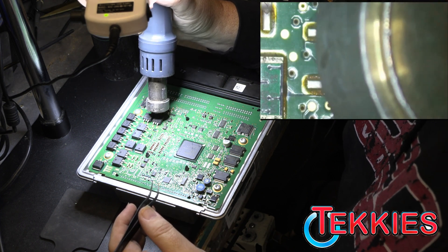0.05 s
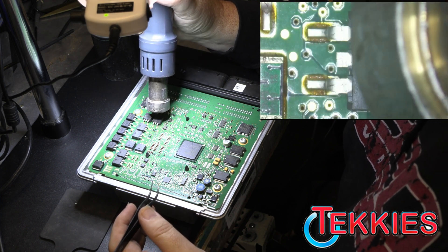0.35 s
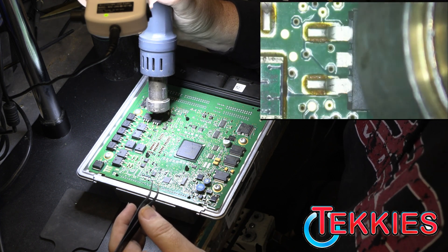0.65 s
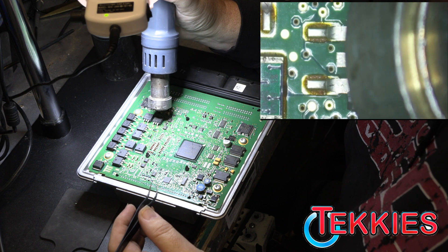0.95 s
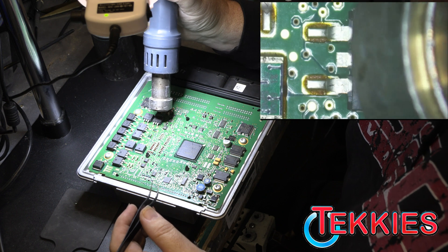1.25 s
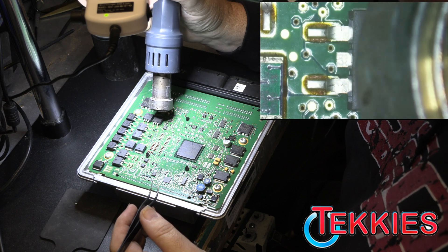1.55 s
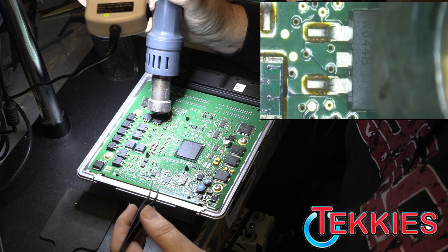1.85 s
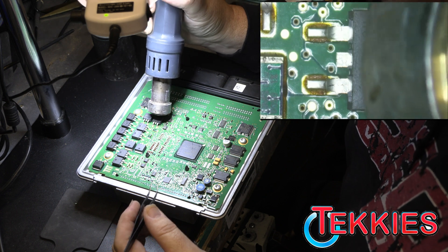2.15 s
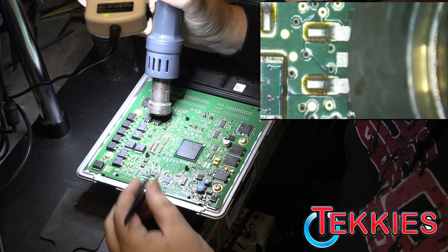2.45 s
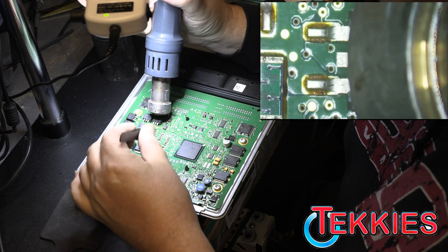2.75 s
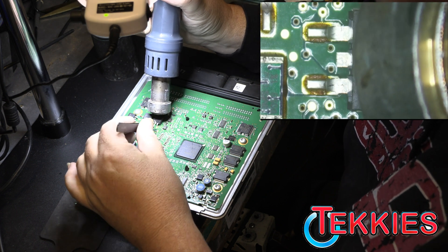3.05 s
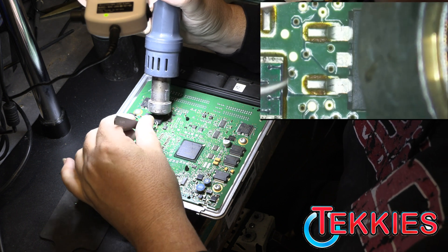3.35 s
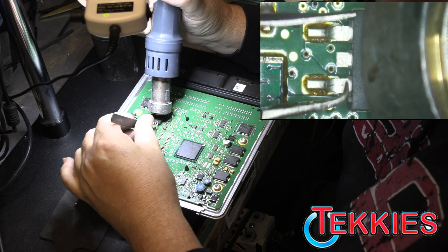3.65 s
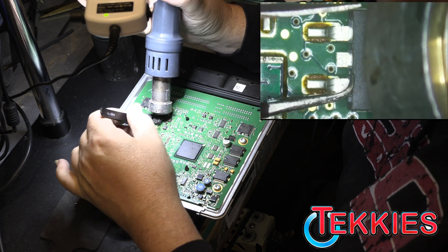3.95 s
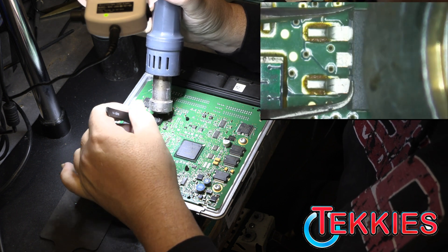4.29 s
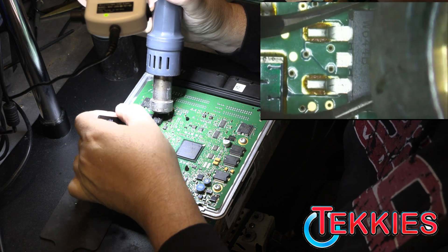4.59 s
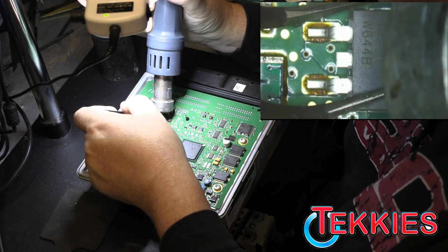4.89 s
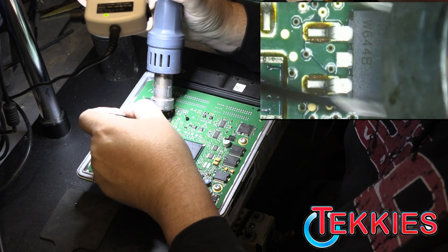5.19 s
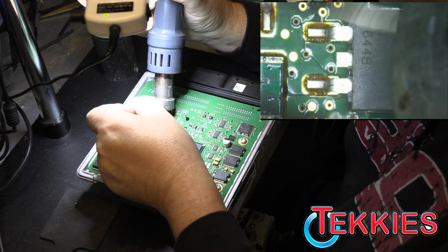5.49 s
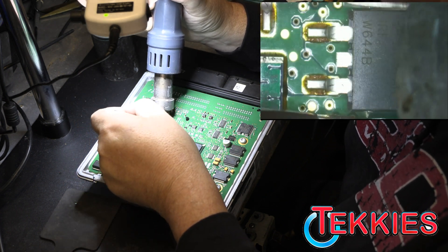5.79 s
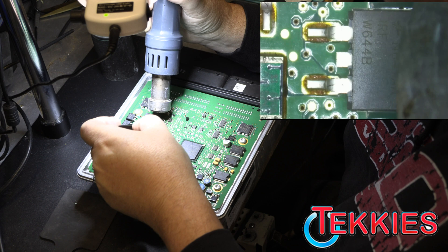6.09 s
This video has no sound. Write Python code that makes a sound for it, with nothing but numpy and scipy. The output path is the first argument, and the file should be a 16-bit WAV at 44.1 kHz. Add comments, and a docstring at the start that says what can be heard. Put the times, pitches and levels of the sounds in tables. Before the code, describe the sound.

A hot air tool blows continuously for about six seconds, heard close up at a workbench. The blower holds a steady low hum with a few thin overtones, beneath a hollow rush of air and a bright hiss from the nozzle. The hiss changes colour gently as the nozzle wanders, swelling a little around 2.5 and 3.8 seconds. Faint, high, airy whistles fade in and out through the first four and a half seconds and return near the end. A very faint electrical hum and bench rumble lie underneath. From about 3.8 to 4 seconds, a hand with tweezers knocks lightly on the circuit board a few times, with another soft tap at 4.5. More small taps with a slight scuff and rattle follow between 5.2 and 5.9 seconds, the clearest at 5.7. The air is still blowing at the end.

```python
"""At a workbench, a hot air rework station blows steadily on a chip of a circuit board.
Blower and transformer hum over a faint bench rumble. Air rushes through the resonant handpiece and
hisses out of the nozzle, changing colour as it wanders and whistling airily where it catches an edge.
In the second half a hand with tweezers knocks lightly on the board."""
import sys
import numpy as np
from scipy import signal
from scipy.fft import rfft, irfft
from scipy.io import wavfile
from scipy.ndimage import map_coordinates

SR = 44100
rng = np.random.default_rng(int(sys.argv[2]) if len(sys.argv) > 2 else 0)


def generate_wav(signal):
    """Clip the signal to [-1, 1] and save it as 16-bit WAV at the path in sys.argv[1]."""
    frames = np.transpose(np.atleast_2d(signal))
    scaled = np.clip(frames, -1, 1) * 32767
    pcm = np.round(scaled).astype(np.int16)
    wavfile.write(sys.argv[1], SR, pcm)


N = 274743
TIME_S = np.arange(N) / SR
BINS_HZ = np.arange(N // 2 + 1) * SR / N


def from_db(db):
    """Decibels to gain."""
    return 10 ** (np.asarray(db) / 20)


def rms(x):
    """Root mean square."""
    return np.sqrt(np.mean(x ** 2) + 1e-20)


def filtered(x, order, hz, kind="low"):
    """Butterworth filter."""
    return signal.sosfilt(signal.butter(order, hz, kind, fs=SR, output="sos"), x)


def automation(points):
    """A (time_s, value) curve, sample by sample."""
    return np.interp(TIME_S, *np.transpose(points))


def eq_curve_db(points):
    """A (freq_hz, gain_db) curve, joined on a log-frequency axis."""
    hz, db = np.transpose(points)
    return np.interp(np.log(BINS_HZ + 1e-9), np.log(hz), db)


def bells_db(bells):
    """Bell-shaped boosts and cuts, widths taken at half height."""
    return sum(db * .5 ** ((2 * (BINS_HZ - centre) / width) ** 2) for centre, width, db in bells)


def drift(rate_hz):
    """Slow random modulation with an rms of 1."""
    size = N // 100 + 2
    rolloff = 1 + (BINS_HZ[:size // 2 + 1] / rate_hz) ** 2
    slow = irfft(rfft(rng.standard_normal(size)) / rolloff, size)
    return np.interp(np.linspace(0, size - 1, N), np.arange(size), slow / rms(slow))


def gate(start_s, length_s, fade_s):
    """Fade in, hold, fade out."""
    return np.clip(np.minimum(TIME_S - start_s, start_s + length_s - TIME_S) / fade_s, 0, 1)


def ring(force, hz, t60_s):
    """One mode: a click sets a decaying sine ringing."""
    decay, angle = from_db(-60 / (t60_s * SR)), 2 * np.pi * hz / SR
    return signal.lfilter([0, np.sin(angle)], [1, -2 * decay * np.cos(angle), decay ** 2], force + 1e-18)


def bench_rumble(level_db=-72, swell_db=7.5, peak_s=4.4, swell_s=.9):
    """A faint, dull rumble that swells while the hand settles on the bench."""
    rumble = filtered(rng.standard_normal(N), 3, [58, 125], "band")
    settling = np.exp(-((TIME_S - peak_s) / swell_s) ** 2)
    return from_db(level_db + swell_db * settling) * rumble / rms(rumble)


def transformer_hum(pitch_hz=120, start_db=-69.5, rise_db_per_s=1.47):
    """The transformer hums on one low tone, creeping up in level."""
    peak = np.sqrt(2) * from_db(start_db + rise_db_per_s * TIME_S)
    return peak * np.sin(2 * np.pi * pitch_hz * TIME_S)


# Blower tones, as multiples of the shaft rate: harmonic, level_db
BLOWER_TONES = [(1, -44), (3, -63.5), (6, -60.5), (12, -56.5)]
def blower_hum(shaft_hz=253.0, wobble_hz=0.173):
    """The blower turns at a nearly fixed speed; turbulence shakes its overtones most."""
    turns = np.cumsum(shaft_hz + wobble_hz * drift(3.33)) / SR
    out = 0
    for harmonic, level_db in BLOWER_TONES:
        flutter = 1 + (0.076 if harmonic == 1 else 0.2) * drift(23.0)
        tone = np.sin(2 * np.pi * (round(harmonic) * turns + rng.random()))
        out += np.sqrt(2) * from_db(level_db) * flutter * tone
    return out


# Ring of the board in its tray: pitch_hz, gain_db, t60_s
BOARD_MODES = [(299, -7, 0.099), (486, -9, 0.058), (615, -3.5, 0.063), (722, -5, 0.075), (925, -4, 0.045),
               (1115, -10, 0.032), (1403, -5, 0.044), (1467, 2.5, 0.056), (1770, 0, 0.038),
               (1870, 2, 0.051), (2140, 6, 0.03), (2290, -1, 0.036)]
def board_ring(force, brightness_hz):
    """Softer contacts ring duller, and the small board radiates little bass."""
    force = filtered(force, 2, brightness_hz)
    force = filtered(force, 2, 220, "high")
    return sum((-1) ** k * from_db(gain_db) * ring(force, pitch_hz, t60_s)
               for k, (pitch_hz, gain_db, t60_s) in enumerate(BOARD_MODES))


# Knock cues: start_s, board_db, contact_s, brightness_hz, rub_db, rattle_db
KNOCK_CUES = [(3.791, -43, 0.028, 2400, -42.5, -54), (3.816, -39, 0.012, 260, -47, -54),
              (3.869, -45, 0.014, 900, -50, -56), (4.02, -40.5, 0.018, 700, -48, -56),
              (4.482, -46, 0.015, 900, -54, -58), (5.251, -43, 0.018, 2000, -44, -53),
              (5.562, -46, 0.01, 1800, -47, -47), (5.702, -33.5, 0.016, 2500, -43, -39),
              (5.882, -38.5, 0.02, 740, -53, -42)]
def tweezer_knocks(scuff=0.69, chatter=0.55, clicks=4):
    """Tap, chatter and scuff ring the board and rattle the tweezers; the rubbing is heard too."""
    out, size = np.zeros(N), SR // 5
    t = np.arange(size) / SR
    for start_s, board_db, contact_s, brightness_hz, rub_db, rattle_db in KNOCK_CUES:
        friction = rng.standard_normal(size) * np.sin(np.pi * np.minimum(t / contact_s, 1) ** .5)
        force = scuff * friction / np.linalg.norm(friction)
        force[0] += 1  # the tap
        chatter_at = (contact_s * SR * rng.random(clicks)).astype(int)
        force[chatter_at] += chatter * rng.choice([-1, 1], clicks)
        body = board_ring(force, brightness_hz)
        rub = filtered(friction, 3, [600, 2200], "band")
        rattle = ring(force, hz=1436, t60_s=.035)  # tweezers, damped by the fingers
        layers = [(board_db, body), (rub_db, rub), (rattle_db, rattle)]
        knock = sum(from_db(db) * layer / rms(layer[t < contact_s]) for db, layer in layers)
        start = round(start_s * SR)
        out[start:start + size] += knock[:N - start]
    return out


# Airy whistle cues: start_s, length_s, pitch_hz, glide_hz_per_s, width_hz, level_db
WHISTLE_CUES = [(-.2, 1.15, 5380, 1, 220, -47.5), (-.2, 1.45, 2838, 0, 950, -47),
                (-.2, 1.1, 7660, 2, 450, -49), (.82, 0.58, 6100, 2, 140, -51),
                (.8, 1.5, 7200, 70.5, 120, -54.5), (1.506, 0.45, 9200, -2, 400, -58),
                (1.901, 1.1, 6270, 201, 450, -53), (2.798, .9, 8100, 99, 200, -52),
                (1.602, 1.34, 1938, 0, 423, -46.5), (2.047, 0.75, 5820, 80, 160, -53),
                (3.706, 0.52, 5900, 0, 160, -50.5), (3.95, .5, 8370, 0, 180, -60),
                (5.8, .7, 7320, 0, 139, -49)]
def edge_whistles(fade_s=0.21):
    """Turbulence in one resonance fades in as the jet meets an edge and glides as it moves along it."""
    out = 0
    for start_s, length_s, pitch_hz, glide_hz_per_s, width_hz, level_db in WHISTLE_CUES:
        turbulence = filtered(rng.standard_normal((2, N)), 2, width_hz / 2)
        glide_hz = glide_hz_per_s * np.clip(TIME_S - start_s, 0, length_s)
        phase = 2 * np.pi * np.cumsum(pitch_hz + glide_hz) / SR
        note = turbulence[0] * np.cos(phase) + turbulence[1] * np.sin(phase)
        out += from_db(level_db) * note / rms(note) * gate(start_s, length_s, fade_s)
    return out


def early_reflections(x, share=0.33, sway_s=.00002, paths=8):
    """Bench, lamp and hands throw the treble back; the paths sway as the nozzle wavers."""
    treble = filtered(x, 2, 3300, "high")
    out = x.copy()
    for delay_s in rng.uniform(.003, .014, paths):
        read_at = (TIME_S - delay_s - sway_s * drift(0.42)) * SR
        for channel in range(2):
            echo = map_coordinates(treble[channel], [read_at], order=2, mode="wrap")
            out[channel] += share / np.sqrt(paths) * echo
    return out


# Detour by way of the board, set by how the nozzle is held: time_s, extra_path_cm
BOUNCE_PATH = [(0, 13.4), (.7, 13.3), (1.1, 16.5), (1.8, 15.2), (2.5, 15.3), (3.3, 14.2), (3.9, 13.5),
               (4.3, 12.4), (5.1, 12.5), (6.23, 14.6)]
def board_bounce(x, share=0.097, sound_cm_per_s=34300):
    """Treble bounces off the board: a light comb filter that slides as the nozzle moves."""
    read_at = np.arange(N) - automation(BOUNCE_PATH) / sound_cm_per_s * SR
    treble = signal.sosfiltfilt(signal.butter(2, 2800, "high", fs=SR, output="sos"), x)
    echo = np.array([map_coordinates(channel, [read_at], order=2, mode="wrap") for channel in treble])
    return x + share * echo


# Dips in the hiss while a position is held: start_s, length_s, centre_hz, width_hz, gain_db
HOLLOW_CUES = [(0.3, 1.3, 6590, 200, -5), (1.2, .55, 6570, 220, -1), (-0.2, 1.1, 5850, 300, -2),
               (1.0, .85, 5620, 330, -4), (-1.5, 1.6, 7600, 200, -2), (-1.5, 1.2, 7500, 200, -2.5),
               (5, 1.35, 4820, 250, -3.5), (4.5, 1.6, 5200, 600, -1.5), (5, .9, 7220, 200, -8),
               (4.5, 0.96, 10400, 2300, -1.8), (3.5, 2.1, 3330, 150, -4), (5.5, 2.2, 6600, 510, -3),
               (4.6, 1.5, 6500, 370, -0.5), (-1.5, 2.25, 13000, 2700, -1)]
def hiss_hollows(x, fade_s=0.082):
    """Bands of the hiss hollow out and fill again as nozzle and hand shift."""
    spectrum, out = rfft(x), x.copy()
    for start_s, length_s, *bell in HOLLOW_CUES:
        cut = irfft(spectrum * (from_db(bells_db([bell])) - 1), N)
        out += gate(start_s, length_s, fade_s) * cut
    return out


# Broad tone of the air stream: freq_hz, gain_db
AIR_EQ = [(30, -23), (80, -9), (140, 3), (400, 5), (900, -7), (1100, -7), (1500, -10), (3000, 0),
          (3550, -4.5), (4200, -3.5), (7800, -4.5), (10500, -20), (13000, -26), (14500, -39.5)]
# Air column of hose and heater barrel: centre_hz, width_hz, gain_db
BARREL_RESONANCES = [(150, 17, 4.5), (208.2, 4, 5.5), (232, 5.5, 5.5), (288.6, 50, 11.5), (340, 36, 2),
                     (378, 45, 3), (619, 35, 7), (703, 17, 4.5), (771, 117, 6.5), (927, 140, 8),
                     (1007, 26, 5.5), (1205, 88, 5.5), (1278, 68, 7), (1365.5, 62, 13.5),
                     (1486.4, 50, 14.5), (1520, 13, 10.5), (1592, 81, 8.5), (1714, 156, 7),
                     (1815.6, 58, 12.5), (1952, 113, 11.5), (2066, 78, 9.5), (2170, 98, 5.5), (2279, 30, 9),
                     (2410, 17, 3.5), (2576, 23, 6), (2607, 43, 5), (2827, 70, 6), (2936, 91, 5),
                     (3047, 46, -0.5), (3170, 210, 3)]
# Nozzle and its gap to the board: centre_hz, width_hz, gain_db
NOZZLE_RESONANCES = [(3570, 200, -1.3), (3893, 123, 6), (4110, 175, 5), (4294, 127, 5), (4980, 440, 7),
                     (5364, 270, 7), (5700, 200, -2.5), (6560, 200, 1), (5850, 150, 2.5), (7240, 130, 3),
                     (7510, 130, 6), (7910, 240, 3), (8450, 590, -5), (9880, 830, 4.5), (12650, 400, 2.5)]
# Stereo width of the air: freq_hz, side_minus_mid_db
AIR_WIDTH = [(30, -26), (60, -13), (230, -20), (650, -14.5), (1100, -12), (1350, -14), (2800, -15),
             (3600, -7.5), (4000, -8.5), (4600, -12), (5200, -13), (6300, -8), (7600, -16.5), (8400, -3.5),
             (10000, -11), (12000, -17), (13000, -32)]
# Pan of the air: freq_hz, left_minus_right_db
AIR_PAN = [(300, 0.5), (1100, 0), (1700, 2), (3000, -0.8), (4400, 2.0), (7000, 1.5), (8000, 3), (9800, 0)]
def handpiece_turbulence():
    """Turbulence coloured by barrel and nozzle; its scattered part differs between left and right."""
    colour_db = eq_curve_db(AIR_EQ) + bells_db(BARREL_RESONANCES) + bells_db(NOZZLE_RESONANCES)
    direct, scattered = rfft(rng.standard_normal((2, N))) * from_db(colour_db)
    left_right = np.array([[1], [-1]])
    side = left_right * scattered * from_db(eq_curve_db(AIR_WIDTH))
    pan = from_db(left_right * eq_curve_db(AIR_PAN) / 2)
    return irfft((direct + side) * pan, N)


# Fader ride as the nozzle wanders, played as a swing about its mean: time_s, fader_db
HISS_RIDE = [(0.0, -40), (0.21, -38), (0.78, -39), (0.9, -40), (1.41, -40.5), (2.51, -36.5), (2.81, -38),
             (3.8, -36.5), (4.5, -38), (5.05, -38.5), (5.62, -40), (6.23, -38)]
# Splits between the air's bands: crossover_hz
CROSSOVERS_HZ = [450, 1100, 2400, 4400, 5700, 8300]
# Hose drone, rush, low barrel, high barrel, nozzle, gap hiss, sizzle: level_db, ride_share, fade_db_per_s
AIR_BANDS = [(-46.5, 0.11, 0), (-48.5, 0.071, 0), (-43, 0.00058, 0.04), (-42, 0.16, 0.26), (-42, 0.62, 0),
             (-42.0, 0.79, 0.31), (-52, 0.48, 0)]
def air_jet(flicker_db=0.27):
    """Air rushes out of the nozzle: the low bands stay nearly steady, the high ones swell as it wanders."""
    spectrum = rfft(board_bounce(early_reflections(handpiece_turbulence())))
    ride_db = automation(HISS_RIDE)
    swing_db = ride_db - ride_db.mean()
    band_of_bin = np.searchsorted(CROSSOVERS_HZ, BINS_HZ)
    out = 0
    for k, (level_db, ride_share, fade_db_per_s) in enumerate(AIR_BANDS):
        band = irfft(spectrum * (band_of_bin == k), N)
        fade_db = fade_db_per_s * (TIME_S - TIME_S.mean())
        band_db = level_db + ride_share * swing_db - fade_db + flicker_db * drift(20)
        out += band / rms(band.mean(axis=0)) * from_db(band_db)
    return out


def scene():
    """Air, hums, rumble and knocks, all close up."""
    air = hiss_hollows(air_jet()) + edge_whistles()
    return air + blower_hum() + transformer_hum() + bench_rumble() + tweezer_knocks()


def record(dry, low_cut_hz=22, high_cut_hz=15000):
    """A gentle cut of the deepest bass and a steep cut of the top."""
    thinned = filtered(dry, 1, low_cut_hz, "high")
    return signal.sosfilt(signal.ellip(10, .1, 80, high_cut_hz, fs=SR, output="sos"), thinned)


dry = scene()
out = record(dry)
generate_wav(out)
```